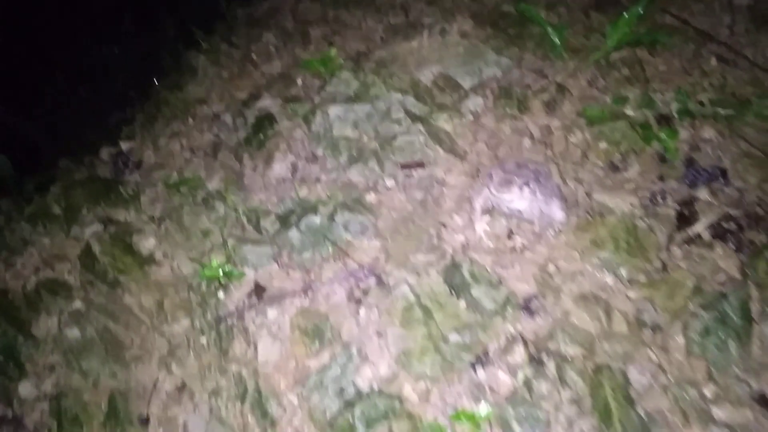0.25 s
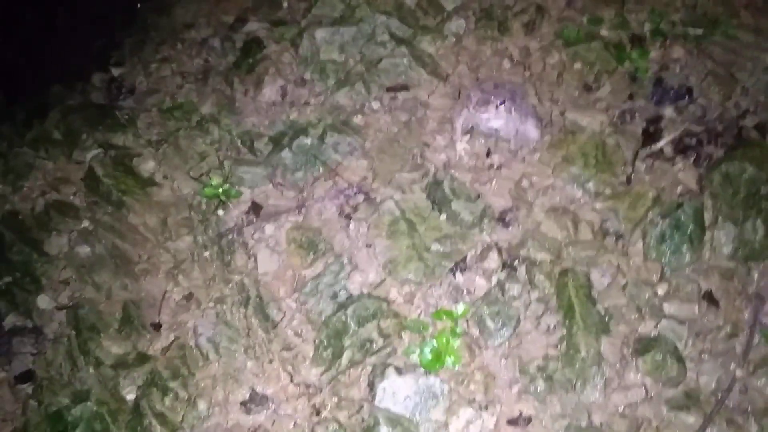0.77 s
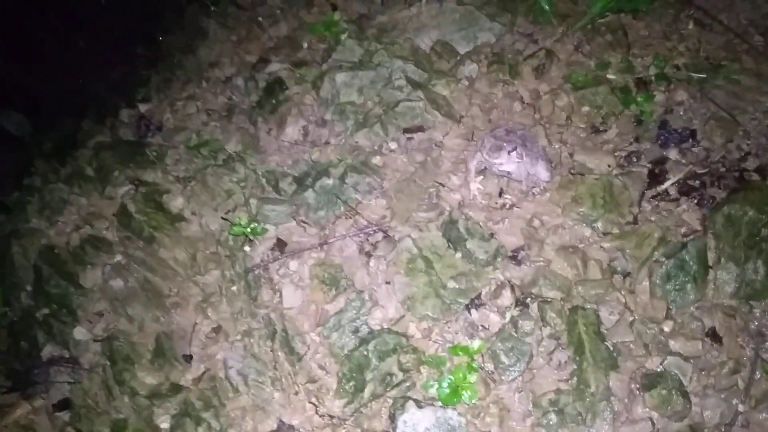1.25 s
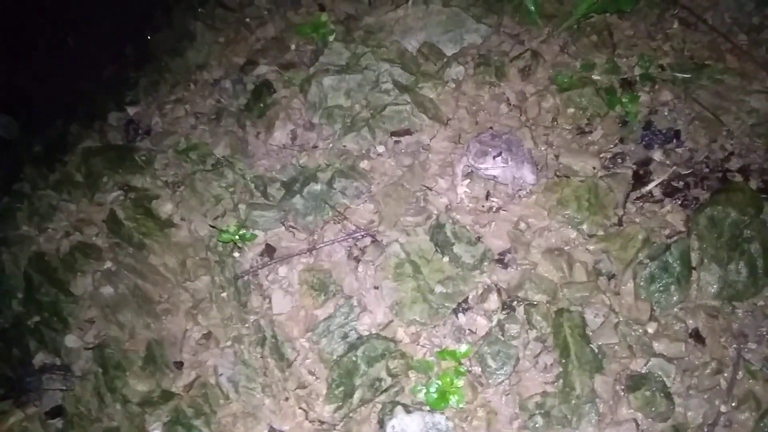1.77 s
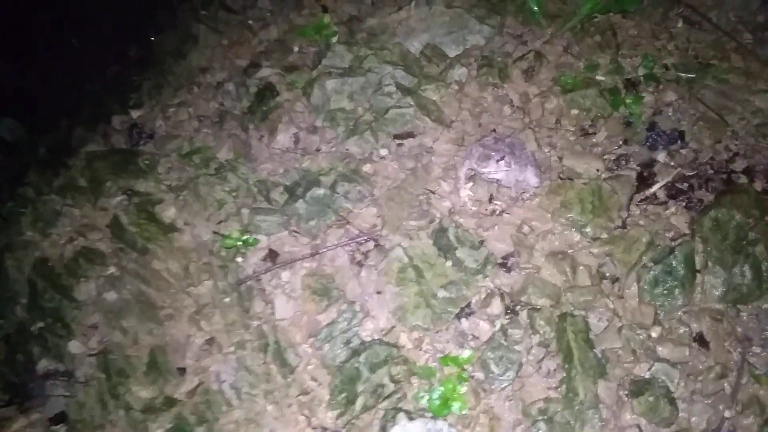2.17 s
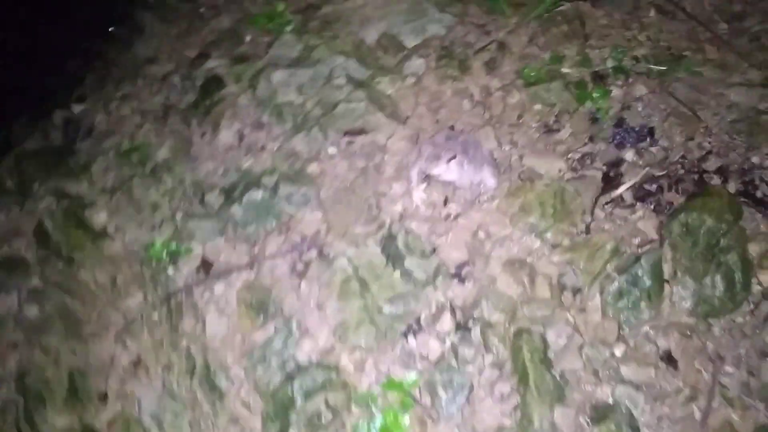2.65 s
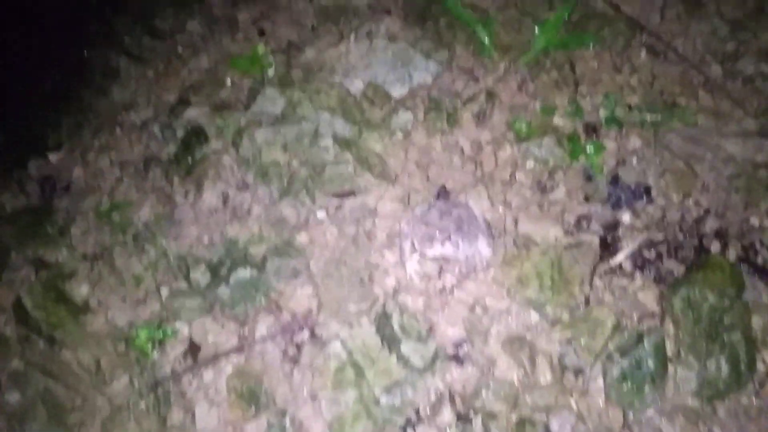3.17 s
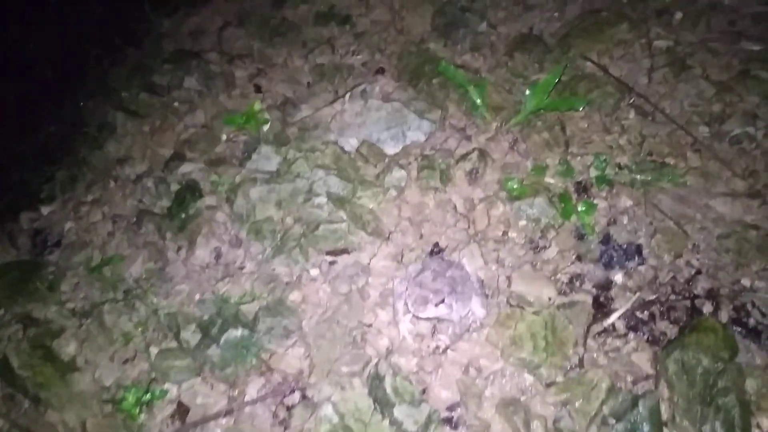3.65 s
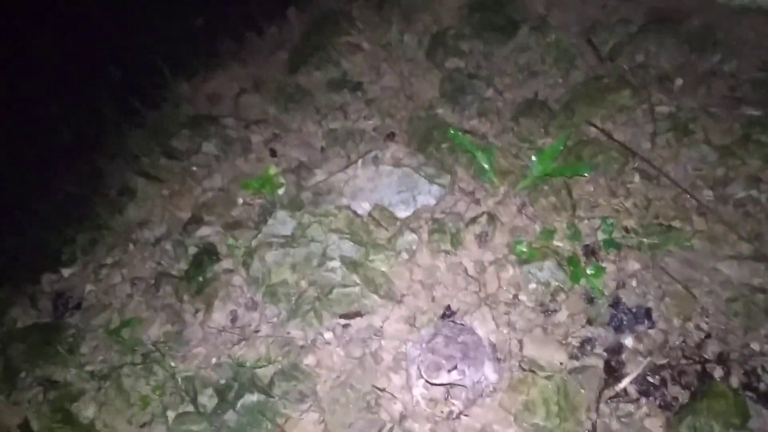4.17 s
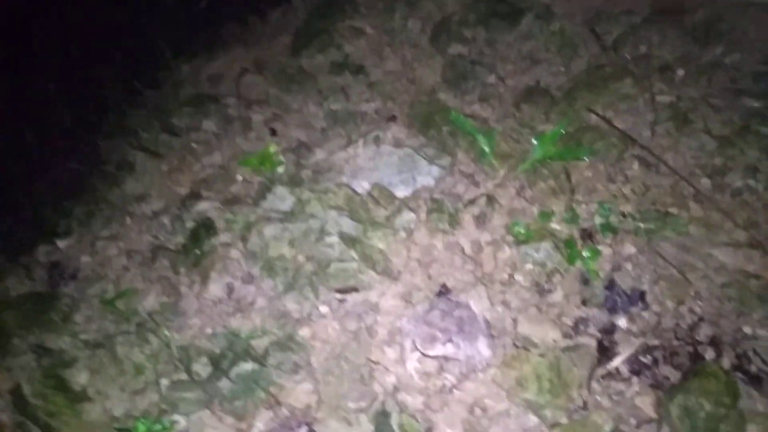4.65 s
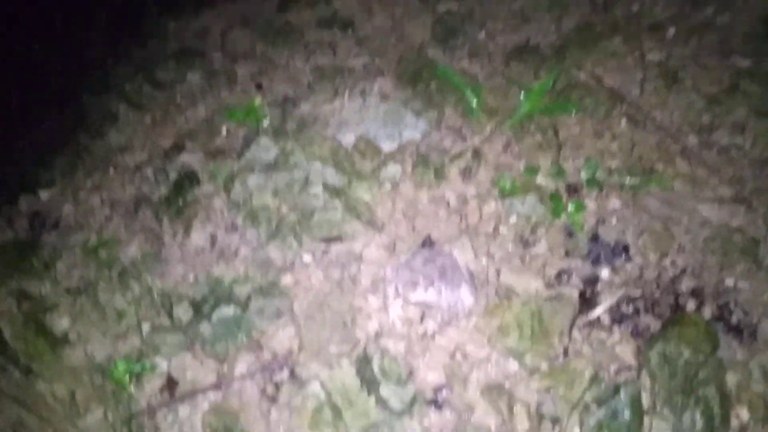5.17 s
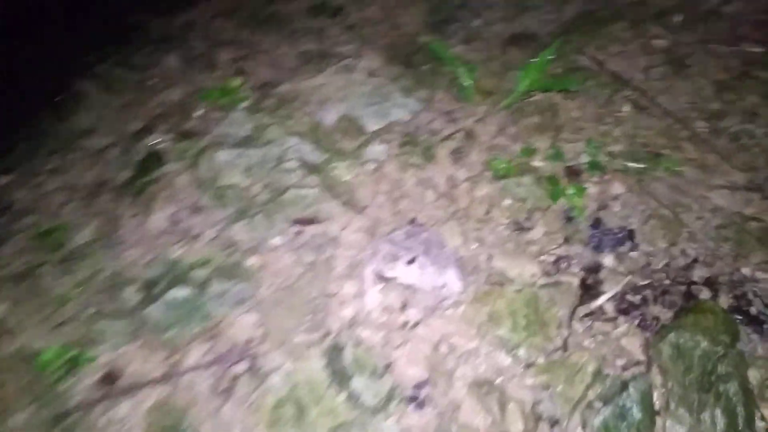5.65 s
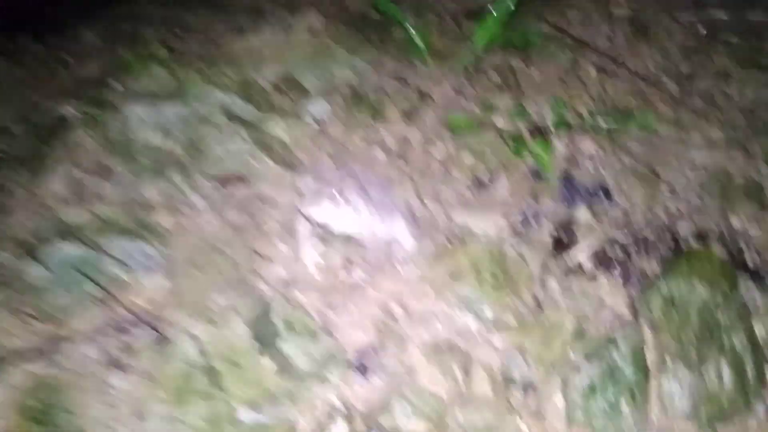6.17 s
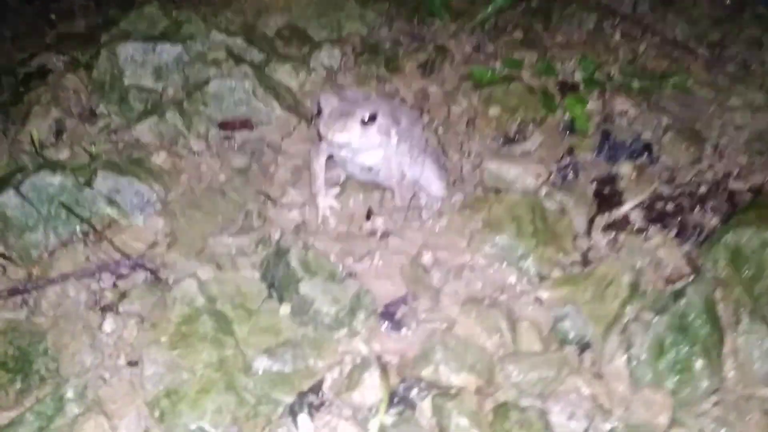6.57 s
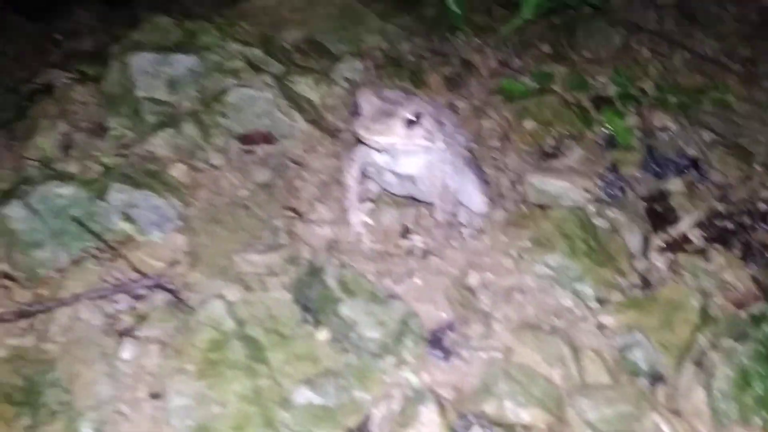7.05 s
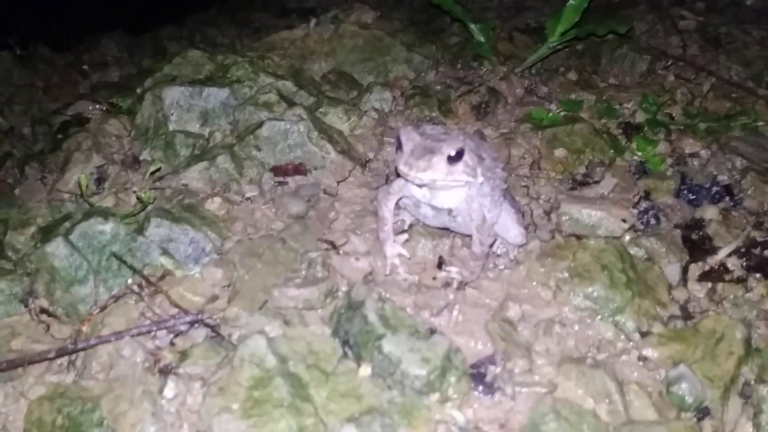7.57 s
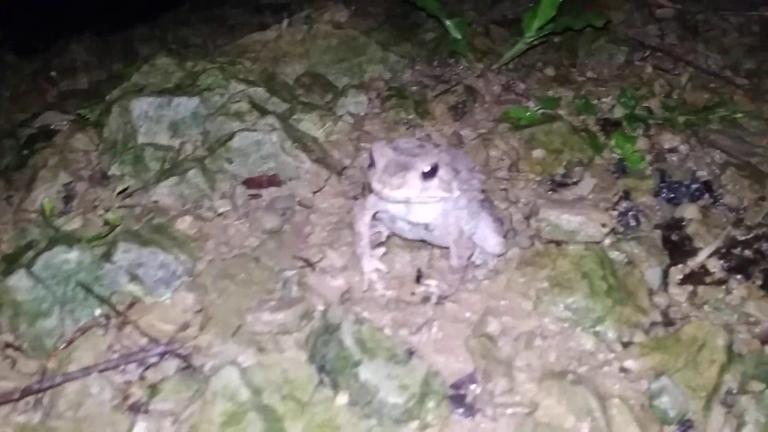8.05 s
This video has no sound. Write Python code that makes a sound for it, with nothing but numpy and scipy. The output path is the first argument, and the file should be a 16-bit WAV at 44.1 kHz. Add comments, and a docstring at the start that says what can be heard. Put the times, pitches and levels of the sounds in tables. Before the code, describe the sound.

Outdoors at night over stony soil, katydids rasp throughout in short, buzzing bursts around 9.5 kilohertz, about five per second, with a slight diffuse echo. Behind them lie thin pulsed cricket trills, a wide hiss of massed insects and leaves, and a barely audible low rumble. Another katydid gives soft, very high lisps near 1.2, 2.7, 4.5, 6.5 and 8 seconds. Close up, dry litter rustles at 0.3 and 1.3, with bright grit ticks around 1.2 to 1.3 and a sharp one at 3.1. Small scuffs and ticks continue, clustering near 5.1. A light slap comes at 5.4, small bumps at 5.6, then the clearest soft, low thump at 5.9 with grit. The insect bed drops back; a scuff follows at 6.85, and isolated ticks at 7.5 and 8.2, with a last scuff near 8.3.

```python
"""A few katydids rasp in step about five times a second, at night on stony ground: bursts of wing-stroke tones.
Behind them are banded noise for leaves and massed insects, pulsed narrow noise for far crickets, the high
hissing lisp of another katydid, and a faint low rumble. Close by, dry litter rustles in swelling noise, grit
ticks as struck resonances, soil scuffs as filtered grains, and soft thumps land as damped falling tones."""
import sys
import numpy as np
from scipy import signal
from scipy.fft import rfft, irfft, next_fast_len
from scipy.io import wavfile
from scipy.ndimage import uniform_filter1d, map_coordinates

SR = 44100
rng = np.random.default_rng(int(sys.argv[2]) if len(sys.argv) > 2 else 0)


def wav_out(sig):
    """Save sig, one row per channel (or a flat mono array), as 16-bit PCM at SR to the path in sys.argv[1]."""
    wavfile.write(sys.argv[1], SR, np.round(np.clip(np.atleast_2d(sig).T, -1, 1) * 32767).astype(np.int16))


N = 366471
TIME = np.arange(N) / SR

# spectrum of the high hiss in the night and in dry litter: (frequency [Hz], relative density [dB per Hz])
FIZZ_SPECTRUM = [(6000, -29), (9000, -2), (10200, 5), (12300, 2), (14000, -1), (15700, -5)]
# mass of far insects, before each layer's own offset: (time [s], level [dB])
INSECT_MASS = [(0, -49), (1.0, -48.5), (1.4, -48.5), (1.85, -49), (2.4, -47.5), (4.45, -49), (4.8, -50.5),
               (5.1, -48.5), (5.55, -48), (5.95, -55), (7.35, -53), (8.31, -53)]


def amp(db):
    """Decibels to gain."""
    return 10 ** (np.asarray(db) / 20)


def unit(x):
    """Scale to rms 1."""
    return x / np.sqrt(np.mean(x ** 2) + 1e-20)


def add(track, start_s, sound):
    """Mix a sound into a track from start_s, cut at the track's end."""
    part = track[max(round(start_s * SR), 0):][:len(sound)]
    part += sound[:len(part)]


def curve(points, time_s):
    """Value of a (time, value) curve at time_s."""
    return np.interp(time_s, *np.transpose(points))


def wobble(knots_per_s):
    """Smooth random curve: a spline through Gaussian knots, evaluated every 64 samples."""
    knots = rng.standard_normal(int(N * knots_per_s / SR) + 4)
    coarse_s = TIME[::64]
    return np.interp(TIME, coarse_s, map_coordinates(knots, [coarse_s * knots_per_s]))


def filtered(x, response):
    """Apply a frequency response by FFT, zero-padded."""
    size = next_fast_len(len(x) + 4096, True)
    spectrum = rfft(x, size) * response(np.fft.rfftfreq(size, 1 / SR))
    return irfft(spectrum, size)[:len(x)]


def resonance(f, centre_hz, width_hz):
    """Causal band-pass response of one damped resonance."""
    damping = 1j * f * width_hz
    return damping / (centre_hz * centre_hz - f * f + damping)


def hiss(points):
    """Noise of rms 1 with a (Hz, dB) spectrum, interpolated over log frequency."""
    hz, db = np.transpose(points)
    return unit(filtered(rng.standard_normal(N), lambda f: amp(np.interp(np.log(f + 1), np.log(hz), db))))


def band(centre_hz, spread_hz):
    """Noise of rms 1 with a Gaussian response around one pitch."""
    response = lambda f: np.exp(-.5 * ((f - centre_hz) / spread_hz) ** 2)
    return unit(filtered(rng.standard_normal(N), response))


def swells(rows, rise_s, fall_s):
    """Summed gain of (time, dB) swells, each rising to its loudest moment and falling away."""
    gain = np.zeros(N)
    for peak_s, db in rows:
        side_s = np.where(TIME < peak_s, rise_s, fall_s)
        gain += amp(db) / (1 + ((TIME - peak_s) / side_s) ** 2) ** 1.05
    return gain


def mass_swing():
    """Insect mass relative to its mean level, in dB."""
    db = curve(INSECT_MASS, TIME)
    return db - db.mean()


def rumble(pitch_hz=35.5, waver_hz=3.0, tone_db=-54.0, noise_db=-65):
    """Faint low drone with wavering pitch, plus soft lumps of low noise."""
    turns = np.cumsum(pitch_hz + waver_hz * wobble(18)) / SR
    drone = amp(tone_db + wobble(7.1)) * unit(np.sin(2 * np.pi * turns))
    lumps = unit(band(40, 70) * amp(4.6 * wobble(18)))
    return drone + amp(noise_db) * lumps


def night(leaves_db=-50.5, massed_offset_db=-1.7, fizz_db=-54.5, leaves_follow=0.34, fizz_follow=0.58):
    """Leaves stir under the hiss of countless far insects; shaped noises rise and fall together."""
    # (frequency [Hz], relative density [dB per Hz])
    leaf_spectrum = [(50, 5.5), (80, -3), (150, -6), (220, -7), (400, -10.5), (700, -11.5), (1300, -11),
                     (2200, -8), (3200, -10), (3950, -11), (4300, -15.5), (5200, -16.5), (7000, -58)]
    # (frequency [Hz], relative density [dB per Hz])
    massed_spectrum = [(3500, -28), (5200, -6), (6000, 0.5), (6400, 0.5), (6800, 4.5), (7500, 3),
                       (8000, 2.5), (8400, -4.5), (9300, 0), (11000, -56)]
    swing_db = mass_swing()
    stir_db = .8 * wobble(14) + .6 * wobble(60)
    leaf_level_db = leaves_db + leaves_follow * swing_db + stir_db + 1.06 * wobble(40)
    leaves = amp(leaf_level_db) * hiss(leaf_spectrum)
    massed_level_db = curve(INSECT_MASS, TIME) + massed_offset_db + 0.98 * wobble(28)
    massed = amp(massed_level_db) * hiss(massed_spectrum)
    fizz = amp(fizz_db + fizz_follow * swing_db + stir_db) * hiss(FIZZ_SPECTRUM)
    return leaves + massed + fizz


def trill(pitch_hz, spread_hz, strokes_per_s, pulsing=0.22):
    """Narrow noise of rms 1, pulsed at a wandering wing-stroke rate."""
    strokes = np.cumsum(strokes_per_s * (1 + 0.0515 * wobble(3.4))) / SR
    return unit((1 + pulsing * np.sin(2 * np.pi * strokes)) * band(pitch_hz, spread_hz))


def crickets(mass_follow=0.47, trill_s=0.17, bout_strokes_per_s=45):
    """Far groups trill as pulsed narrow noise, swelling with the insect mass; single ones join briefly."""
    # (pitch [Hz], spread [Hz], level [dB], wing strokes [1/s], swell depth, either sign [dB])
    groups = [(3282, 18, -70.5, 56, 5.5), (3460, 21, -69, 73, 4), (3757, 36, -66.5, 48, 9),
              (4110, 26, -71, 36, 5), (4702, 60, -63, 58, 1), (4840, 53, -63.5, 66, -5),
              (4990, 38, -67.5, 46, 4.5), (6740, 72, -64.5, 96, 16), (7100, 92, -60, 88, 1),
              (7480, 140, -62, 180, 2.5), (7950, 77, -70.5, 59, 4)]
    # (first trill [s], end of bout [s], trill interval [s], pitch [Hz], pitch scatter [Hz],
    #  spread [Hz], peak envelope level [dB])
    bouts = [(.72, 4.8, .45, 3950, 100, 38, -64), (4.73, 5.55, 0.22, 5300, 50, 150, -58)]
    mass = amp(mass_follow * mass_swing())
    chorus = np.zeros(N)
    for pitch_hz, spread_hz, db, strokes_per_s, swell_db in groups:
        swell = amp(swell_db * np.tanh(wobble(7))) * mass
        chorus += amp(db) * unit(swell * trill(pitch_hz, spread_hz, strokes_per_s))
    for first_s, end_s, interval_s, pitch_hz, scatter_hz, spread_hz, db in bouts:
        for middle_s in np.arange(first_s, end_s, interval_s):
            trill_hz = pitch_hz + scatter_hz * rng.standard_normal()
            envelope = np.exp(-(2 * (TIME - middle_s) / trill_s) ** 2)
            chorus += amp(db) * envelope * trill(trill_hz, spread_hz, bout_strokes_per_s)
    return chorus


def high_katydid(rise_s=0.053, fall_s=0.058):
    """Short hissing lisps of broadly tuned wings: two noise bands, rising slightly faster than they fall."""
    # (loudest moment [s], level [dB])
    lisps = [(1.18, -51), (2.69, -51.5), (4.48, -49), (6.49, -51), (7.96, -50)]
    tone = unit(band(12300, 600) + .7 * band(13300, 1300))
    return swells(lisps, rise_s, fall_s) * tone * amp(1.5 * wobble(90))


def rustles(rise_s=0.068, fall_s=.08, flutter_db=2, body_db=-4):
    """Dry litter shifts: an uneven high hiss with a little leafy body."""
    # (loudest moment [s], level of the hiss [dB])
    shifts = [(.3, -48), (1.0, -55), (1.29, -51), (3.1, -60), (4.41, -54), (5.08, -55), (5.46, -49.5)]
    gain = swells(shifts, rise_s, fall_s) * amp(flutter_db * wobble(70))
    return gain * (hiss(FIZZ_SPECTRUM) + amp(body_db) * band(3500, 3200))


def snap(ring_db, ring_hz, width_hz, knock_db, tail_db, snap_t60_s=0.011, splinter=0.18, knock_t60_s=0.014,
         tail_t60_s=0.12, crumble_db=-2):
    """A brittle crack rings a small piece, knocks the ground and crumbles."""
    t = np.arange(SR // 8) / SR

    def burst(t60_s):
        return rng.standard_normal(len(t)) * amp(-60 * t / t60_s)

    def sized(x, db):  # all energy referred to 5 ms
        return amp(db) * x * np.sqrt(.005 * SR / np.sum(x ** 2))

    piece = lambda f: resonance(f, ring_hz, width_hz) * resonance(f, ring_hz, 5 * width_hz)
    ground = lambda f: resonance(f, 2260, 2550)
    grit = lambda f: resonance(f, 8000, 6500) * resonance(f, ring_hz, 4 * width_hz)
    # one clean break, then splinters
    crack = signal.unit_impulse(len(t), 8)
    splinters = splinter * (burst(snap_t60_s) + 0.15 * burst(0.068))
    ring = sized(filtered(crack + splinters, piece), ring_db)
    knock = sized(filtered(crack + splinter * burst(knock_t60_s), ground), knock_db)
    crumbs = burst(tail_t60_s) * np.exp(.5 * rng.standard_normal(len(t)))
    return ring + knock + sized(filtered(crumbs, grit), ring_db + tail_db + crumble_db)


def litter(count=36, faint_db=-50, range_db=7, settled_s=6.1, late_share=.15, settled_db=-3):
    """Clear snaps, and random fainter ones that thin out and soften once the grit has settled."""
    # (time [s], ring level [dB], ring pitch [Hz], ring width [Hz], knock level [dB],
    #  crumbling re ring, before the common crumble_db [dB])
    ticks = [(0.2117, -37.5, 11400, 3900, -36.5, -10), (0.319, -38, 9000, 4500, -35, -7),
             (0.5642, -38, 6960, 4500, -38, -13), (1.152, -33.5, 7500, 4600, -41, 1.5),
             (1.224, -28, 11200, 4200, -38.5, -3), (1.3079, -22, 10500, 7100, -39.5, -7.5),
             (1.3874, -43, 9500, 2000, -41, 4), (2.3326, -35.5, 10000, 2300, -60, -13),
             (2.4579, -43, 9800, 2900, -40.5, -5), (2.7505, -38.5, 12900, 3100, -45, -16),
             (3.0504, -34.5, 8650, 2600, -47, -4), (3.121, -18.5, 13200, 2200, -47, -15),
             (3.2794, -41, 6000, 2600, -37.5, -3), (3.5434, -36, 10900, 2400, -44, 0),
             (3.7168, -30.5, 11200, 3400, -60, -19), (3.919, -36, 9050, 3100, -41.5, 3.5),
             (4.2858, -29.5, 8550, 1300, -42.5, -12), (4.8622, -42, 5500, 1400, -46, -18),
             (5.0541, -31.5, 11400, 1400, -50, -8), (5.081, -27.5, 7900, 1400, -45, -15),
             (5.087, -33, 12100, 4500, -39, -16), (5.196, -37, 9600, 2900, -44, 3),
             (5.2176, -32, 9400, 3600, -33, -9), (5.5877, -38, 11200, 5200, -36.5, -18),
             (5.924, -38.5, 3670, 1400, -50, -18), (5.9765, -35.5, 10800, 1600, -60, -2),
             (6.0093, -28.5, 12650, 1200, -52, -22), (7.462, -28, 12900, 1200, -46, -15),
             (8.1795, -24.5, 14100, 1900, -51, -12)]
    track = np.zeros(N)
    for time_s, *piece in ticks:
        add(track, time_s, snap(*piece))
    for when, size, pitch in rng.random((count, 3)):
        time_s = np.interp(when, [0, 1 - late_share, 1], [0, settled_s, N / SR])
        db = faint_db + range_db * (size - .5) + settled_db * (time_s > settled_s)
        add(track, time_s, snap(db, 6000 + 7000 * pitch, 4000, db + 2.5, 0))
    return track


def scuffs(grains_per_s=1000, bed=0.11, bite=1.2):
    """Soil grinds briefly: a first bite, then separate grains give way over a finer rub."""
    # (time [s], level over half the length [dB], centre [Hz], width [Hz], length [s])
    grinds = [(0.424, -35.5, 1170, 650, 0.004), (1.689, -45.5, 900, 1810, 0.023),
              (2.66, -45, 1460, 1400, 0.044), (3.375, -40, 1310, 2200, 0.034),
              (3.508, -45, 1100, 2400, 0.048), (3.733, -45, 1500, 2400, 0.0084),
              (4.283, -42.5, 900, 1800, 0.012), (4.408, -42.5, 1900, 1400, 0.011),
              (5.004, -40.5, 2580, 1700, 0.018), (5.711, -43, 895, 1200, .005),
              (5.95, -40.5, 1200, 1300, 0.0033), (5.999, -41.5, 2540, 1100, 0.029),
              (6.846, -37, 2300, 1900, 0.014), (6.872, -44, 1520, 2400, 0.032),
              (6.871, -46, 396, 600, 0.06), (7.873, -46, 790, 600, 0.0056),
              (8.277, -35.5, 2360, 1700, 0.008)]
    track = np.zeros(N)
    t = np.arange(SR // 3) / SR
    for time_s, db, centre_hz, width_hz, length_s in grinds:
        slips = rng.random(len(t)) < grains_per_s / SR
        grains = (slips + bed) * rng.standard_normal(len(t)) * np.exp(-(t / length_s) ** 1.3)
        grains += bite * signal.unit_impulse(len(t), 40)
        soil = lambda f: resonance(f, centre_hz, width_hz) / (1 + (f / (centre_hz + width_hz)) ** 4)
        rub = filtered(grains, soil)
        add(track, time_s, amp(db) * rub * np.sqrt(.5 * length_s * SR / np.sum(rub ** 2)))
    return track


def thumps(slap_t60_s=0.0077, slap_hz=850, slap_width_hz=900, soft_hz=1500,
           clod_db=-2, clod_hz=215, clod_t60_s=0.024):
    """A soft weight slaps the earth, which answers with a low damped thud and the dull knock of a clod."""
    # (time [s], thud level [dB], thud pitch [Hz], thud t60 [s], slap peak level [dB])
    landings = [(5.407, -40.5, 200, 0.054, -28.5), (5.5873, -33, 155, 0.02, -43),
                (5.634, -45, 220, .04, -40), (5.924, -19, 103, 0.067, -20.5),
                (5.988, -40.5, 119, 0.071, -60), (6.873, -46.5, 135, 0.12, -44)]
    track = np.zeros(N)
    t = np.arange(SR // 4) / SR
    earth = lambda f: resonance(f, slap_hz, slap_width_hz) / np.sqrt(1 + (f / soft_hz) ** 6)
    # clod level is relative to the thud
    clod = np.sin(2 * np.pi * clod_hz * t) * amp(clod_db - 60 * t / clod_t60_s)
    for time_s, db, thud_hz, t60_s, slap_db in landings:
        # contact is stiffest at first, so the thud starts an octave higher
        turns = np.cumsum(thud_hz * (1 + np.exp(-t / 0.0031))) / SR
        thud = amp(db) * (np.sin(2 * np.pi * turns) * amp(-60 * t / t60_s) + clod)
        scrape = 0.074 * rng.standard_normal(len(t)) * amp(-60 * t / slap_t60_s)
        slap = filtered(signal.unit_impulse(len(t), 40) + scrape, earth)
        add(track, time_s, thud + amp(slap_db) * slap / np.abs(slap).max())
    return track


def undergrowth(x, t60_s):
    """Diffuse echo from stems and stones, as strong as its input: convolution with decaying noise."""
    t = np.arange(SR // 2) / SR
    tail = rng.standard_normal(len(t)) * amp(-60 * t / t60_s) * (1 - np.exp(-t / 0.0014))
    return unit(signal.fftconvolve(x, tail)[:N]) * np.std(x)


def chirps(scatter_db=0.44, jitter_s=.004):
    """(middle [s], level [dB]) of every chirp: a steady beat that slackens once."""
    # how loudly they sing: (time [s], level [dB])
    effort = [(0, -49), (.52, -45), (1.35, -49), (2.25, -47.5), (2.7, -47), (3.7, -44.5), (4.2, -48.5),
              (5.4, -48), (5.85, -52), (6.8, -50.5), (8.31, -48.5)]
    first_s, beat_s = .1387, .19433
    slacken_s, slack_beat_s = 6.74, .2038
    brisk = np.arange(first_s, slacken_s - beat_s / 2, beat_s)
    slack = np.arange(slacken_s, N / SR, slack_beat_s)
    middle_s = np.concatenate([brisk, slack])
    late, loud = rng.standard_normal((len(middle_s), 2)).T
    return np.transpose([middle_s + jitter_s * late, curve(effort, middle_s) + scatter_db * loud])


def wings(beat, pitch_hz, level_db, strokes_per_s, lead_s, half_length_s,
          sweep_hz=130, stray_hz=22, stroke_depth=0.58):
    """One katydid: each chirp is a burst of wing strokes, and the pitch sags within each stroke."""
    song = np.zeros(N)
    t = np.arange(-SR // 8, SR // 8) / SR
    for middle_s, db in beat:
        strokes = strokes_per_s * (1 + 0.05 * rng.standard_normal()) * t + rng.random()
        phase = strokes % 1
        # one random size and detuning per stroke
        size, detune = rng.standard_normal((2, 64))[:, np.floor(strokes).astype(int)]
        swell = np.exp(-(t / half_length_s) ** 6)
        hz = pitch_hz - sweep_hz * (phase - .5) + stray_hz * detune + 12 * rng.standard_normal()
        stroke = 1 - stroke_depth + stroke_depth * np.sin(np.pi * phase) ** 2 * amp(3.8 * size)
        tone = np.sin(2 * np.pi * np.cumsum(hz) / SR)
        add(song, middle_s - lead_s + t[0], 2 * amp(db + level_db) * swell * stroke * tone)
    return song


def katydids(echo_db=-5, rasp_db=-12):
    """Neighbours share a beat on different pitches; uneven file teeth spread a noise rasp around the tones."""
    # (pitch [Hz], level re the beat's [dB], wing strokes [1/s], lead on the beat [s], half length [s])
    males = [(9553, -1.7, 71, .004, 0.068), (9710, -12, 76, .03, .055), (9374, -9.5, 82, .004, 0.059)]
    beat = chirps()
    song = sum(wings(beat, *male) for male in males)
    envelope = np.sqrt(np.abs(uniform_filter1d(song ** 2, size=200)))
    song = song + amp(rasp_db) * envelope * band(9700, 220)
    return song + amp(echo_db) * undergrowth(song, t60_s=0.18)


def scene():
    """Sum all sources at one microphone, alike in both channels."""
    distance = rumble() + night() + crickets() + high_katydid()
    ground = rustles() + litter() + scuffs() + thumps()
    mono = distance + ground + katydids()
    return np.array([mono, mono])


def record(dry, top_hz=15950, slope_hz=300):
    """Band-limit the recorder: a linear cutoff slope centred on top_hz."""
    response = lambda f: np.clip((top_hz - f) / slope_hz + .5, 0, 1)
    return np.array([filtered(x, response) for x in dry])


dry = scene()
out = record(dry)
wav_out(out)
```